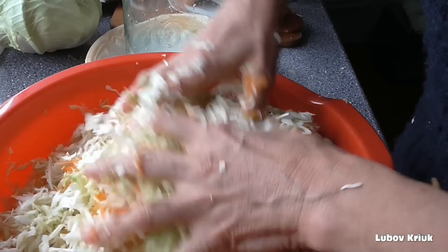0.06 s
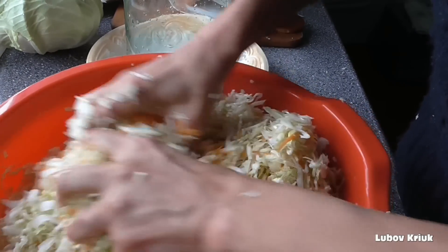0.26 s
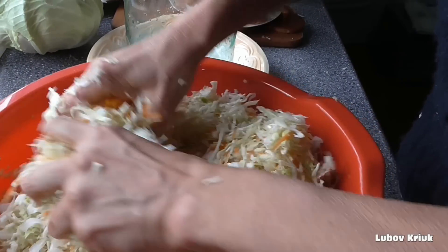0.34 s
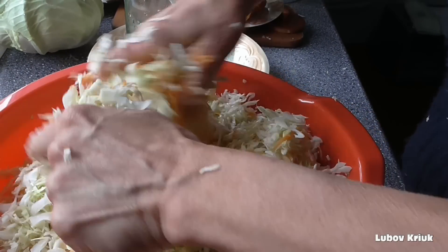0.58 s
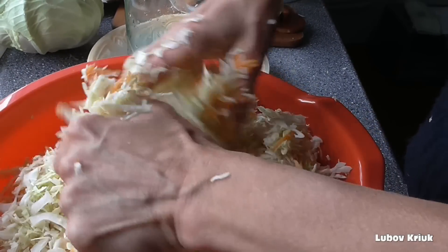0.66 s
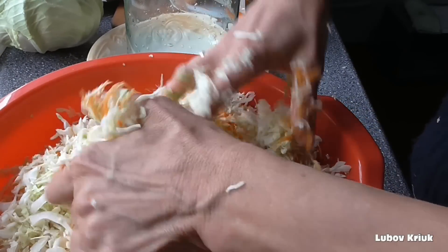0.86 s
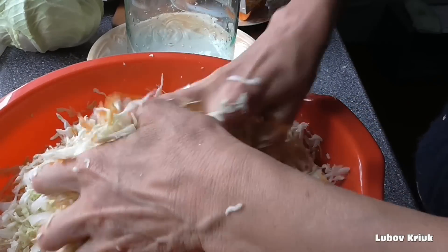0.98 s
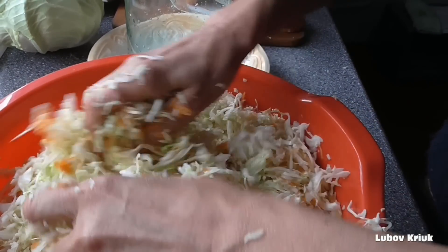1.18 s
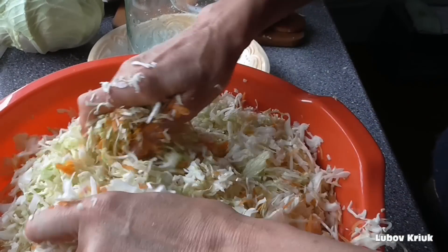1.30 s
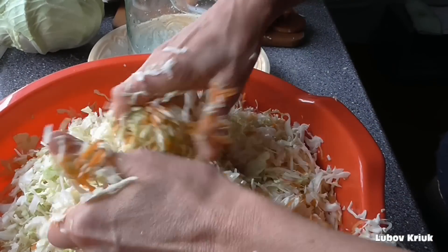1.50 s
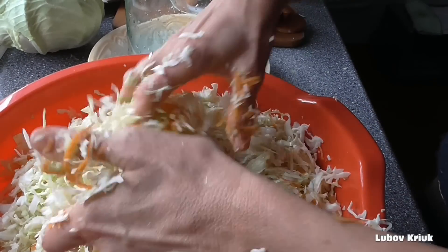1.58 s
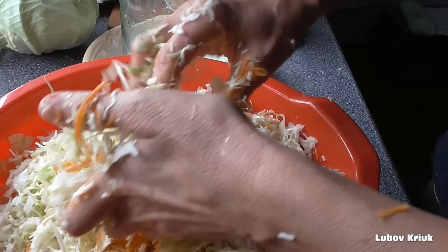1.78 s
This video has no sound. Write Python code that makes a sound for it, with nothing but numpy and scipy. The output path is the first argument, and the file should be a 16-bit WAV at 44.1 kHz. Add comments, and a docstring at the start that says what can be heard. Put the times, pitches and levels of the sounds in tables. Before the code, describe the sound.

Soft, wet crackle of shredded cabbage being squeezed by hand while its plastic bowl knocks.

```python
"""A soft, wet rustle and a few hollow knocks: two hands toss and squeeze shredded cabbage in a wide
plastic bowl on a kitchen counter, close to a stereo microphone. The shreds crackle as they slide and
part, juice ticks, and now and then a shred snaps. The heap rubs along the bowl, which knocks, judders
on its foot and thuds on the counter. Behind it an appliance hums in the small room."""
import sys
import numpy as np
from scipy import signal
from scipy.fft import rfft, irfft, next_fast_len
from scipy.io import wavfile

SR = 44100
rng = np.random.default_rng(int(sys.argv[2]) if len(sys.argv) > 2 else 0)


def transcribe(u):
    """Save the signal u as a 16-bit wav file named by the first command-line argument.

    u: samples, shape (n,) or (channels, n), limited to [-1, 1]; the rate is SR.
    q: integer samples, one column per channel.
    """
    v = np.clip(np.atleast_2d(u).T, -1, 1)
    q = np.round(v * 32767).astype(np.int16)
    wavfile.write(sys.argv[1], SR, q)


N = 81585
TIME = np.arange(N) / SR
SHRED_ROOM_DB, SNAP_ROOM_DB, BOWL_ROOM_DB = -9, -5, -6   # room tail against the direct sound

# How hard the hands stir the shreds. Each row: time in seconds, level in dB.
STIRRING = [(0, -48.5), (.056, -63.5), (.13, -64.5), (.22, -60.5), (.29, -51.5), (.335, -45.5), (.39, -44),
            (.45, -41.5), (.54, -46), (.62, -46), (.76, -45.5), (.85, -44), (.94, -43), (1.055, -54.5),
            (1.085, -50), (1.125, -57.5), (1.2, -47), (1.27, -54.5), (1.33, -43), (1.38, -42.5),
            (1.52, -43), (1.68, -53.5), (1.74, -61.5), (1.8, -68), (1.85, -71)]
# Stereo width of the close shreds. Each row: frequency in Hz, side against mid in dB.
SHRED_WIDTH = [(300, -13), (2500, -20), (5500, -17.5), (8500, -12.5), (11000, -2), (15000, -7)]
# Stereo width of the bowl. Each row: frequency in Hz, side against mid in dB.
BOWL_WIDTH = [(60, -17), (200, -26), (600, -19), (1500, -13.5), (3000, -8.5)]


def from_db(db):
    """Decibels to gain."""
    return 10 ** (np.asarray(db) / 20)


def rms_one(x):
    """Scale to unit power."""
    return x / np.sqrt(np.mean(x ** 2) + 1e-20)


def colour(x, points):
    """Causal (minimum-phase) filter through (Hz, dB) points on a log-frequency axis."""
    size = 2 * next_fast_len(N)
    bins_hz = np.arange(size // 2 + 1) * SR / size
    hz, db = np.transpose(points)
    gain = from_db(np.interp(np.log(bins_hz + 1), np.log(hz), db))
    cepstrum = irfft(np.log(gain))
    cepstrum[1:size // 2] *= 2
    cepstrum[size // 2 + 1:] = 0
    return irfft(rfft(x, size) * np.exp(rfft(cepstrum)))[..., :N]


def drift(hz):
    """A random waver with spread 1, mostly slower than hz."""
    step, settle = 40, 2000
    pole = np.exp(-2 * np.pi * hz * step / SR)
    draws = rng.standard_normal(N // step + settle + 2)
    slow = signal.lfilter([1], [1, -2 * pole, pole * pole], draws)[settle:]
    return np.interp(np.arange(N) / step, np.arange(len(slow)), rms_one(slow))


def ring(x, hz, t60):
    """One mode: a unit click sets a sine of height 1 ringing."""
    radius, angle = np.exp(-np.log(1000) / (t60 * SR)), 2 * np.pi * hz / SR
    return signal.lfilter([0, np.sin(angle)], [1, -2 * radius * np.cos(angle), radius ** 2], x + 1e-18)


def band(x, hz, q):
    """A broad resonance with gain 1 at its peak."""
    return signal.lfilter(*signal.iirpeak(min(hz, SR / 3), max(q, 1), fs=SR), x + 1e-18)


def stereo(mid, side, width):
    """The two microphone ports share the mid and take the filtered side with opposite signs."""
    return mid + colour(side, width) * np.array([[1], [-1]])


def noise(spectrum, width):
    """Smooth stereo noise of a given colour, at unit power."""
    mid, side = rng.standard_normal((2, N))
    return rms_one(colour(stereo(mid, side, width), spectrum))


def grains(per_s, spread_db):
    """Random clicks of uneven size and either sign."""
    sizes = from_db(spread_db * np.minimum(rng.exponential(1, N), 4.5))
    return sizes * rng.choice([-1, 1], N) * (rng.random(N) < per_s / SR)


def swell(peak_s, db, rise, hold, fall):
    """A gain that rises, holds and falls, straight in dB."""
    before, after = np.maximum(peak_s - TIME, 0), np.maximum(TIME - peak_s - hold, 0)
    return from_db(db - rise * before - fall * after)


def kitchen(x, wet_db):
    """The direct sound reaches the microphone first, then the small room's short diffuse tail."""
    t60_s, gap_s, width = 0.21, 0.0024, 0.31
    mid, side = rng.standard_normal((2, SR // 2))
    t = TIME[:SR // 2]
    tail = (mid + width * side * np.array([[1], [-1]])) * np.exp(-np.log(1000) * t / t60_s) * (t > gap_s)
    tail /= np.sqrt(np.sum(tail ** 2) / 2)
    return x + from_db(wet_db) * signal.fftconvolve(np.atleast_2d(x), tail, axes=1)[:, :N]


def room_tone():
    """Faint, diffuse noise from all round the kitchen."""
    # Colour of the room noise. Each row: frequency in Hz, relative density in dB.
    spectrum = [(25, -23), (50, -9), (130, -7), (220, 2.5), (350, -4), (550, 0.5), (1200, -14.5),
                (2700, -22), (8000, -20), (16000, -25)]
    # Its stereo width. Each row: frequency in Hz, side against mid in dB.
    width = [(30, -5), (100, -7), (250, -7), (450, -1), (3000, 4.5), (6000, -1), (15000, -13)]
    return from_db(-57.5) * noise(spectrum, width)


def appliance_hum():
    """Two wavering tones beat and reach the microphone ports slightly out of step."""
    # The hum's tones. Each row: frequency in Hz, mean level in dB.
    tones = [(194.5, -64.5), (231.3, -63)]
    waver_db, lag_turns = 3.26, -0.074 * np.array([[.5], [-.5]])
    hum = 0
    for hz, db in tones:
        height = np.sqrt(2) * from_db(db + waver_db * drift(hz=6.3))
        hum = hum + height * np.sin(2 * np.pi * (hz * TIME + rng.random() + lag_turns))
    return hum


def thuds():
    """The weight of the hands reaches the counter as a dull rumble."""
    # The heap is pressed down. Each row: peak time in seconds, level in dB, rise in dB per second,
    # hold in seconds, fall in dB per second.
    presses = [(0.127, -67.5, 700, .025, 250), (0.277, -60, 403, 0.074, 51), (0.83, -62.5, 700, 0.025, 105),
               (0.982, -48.5, 125, 0.028, 450), (1.087, -48.5, 700, 0.051, 139)]
    # Colour of the rumble. Each row: frequency in Hz, relative density in dB.
    spectrum = [(35, -44), (65, -21), (98, -2), (135, -9), (200, -11), (310, -14), (600, -39.5)]
    return sum(swell(*press) for press in presses) * noise(spectrum, BOWL_WIDTH)


def judder():
    """Under the hardest push the bowl's foot sticks and slips in a quick, nearly even train."""
    # Course of the judder. Each row: time in seconds, level in dB.
    levels = [(.8, -81), (.83, -52.5), (.875, -55), (.915, -38.5), (.965, -40), (1.005, -44), (1.04, -58),
              (1.09, -57), (1.2, -80)]
    # Modes of the shaken counter. Each row: frequency in Hz, relative level in dB, t60 in seconds.
    counter_modes = [(167, -8.5, 0.14), (246, 0.5, 0.15), (486, -3, 0.096), (576, -2, 0.11),
                     (642, 2.5, 0.06), (808, 0.5, 0.064), (1630, -22, 0.045)]
    slip_hz, jitter, uneven_db = 82.1, 0.0196, 0.9
    turns = np.cumsum(slip_hz * (1 + jitter * drift(hz=27.4))) / SR
    slips = np.diff(np.floor(turns), prepend=0) * from_db(uneven_db * drift(hz=64))
    shaken = rms_one(sum(from_db(db) * ring(slips, hz, t60) for hz, db, t60 in counter_modes))
    return from_db(np.interp(TIME, *np.transpose(levels))) * shaken


def knocks():
    """The bowl strikes the counter a little left of centre: a hollow clack, then its body rings."""
    # Each row is a knock: start in seconds, clack level in dB, pitch in Hz, ring against clack in dB.
    hits = [(0.1037, -39, 940, -1), (.1075, -43.5, 1890, 14.5), (0.1422, -44.5, 1520, 12),
            (0.1549, -32, 900, -1), (0.2145, -30, 1846, 6.5), (.803, -35.5, 1710, 4.5),
            (1.3591, -25.5, 1710, -19), (1.3757, -15.5, 1840, -7)]
    # A contact's brief tones. Each row: multiple of its pitch, relative level in dB, t60 in seconds.
    contact_tones = [(.72, -13.5, 0.025), (1, 6, 0.0091), (1.75, -12, 0.013)]
    # The bowl's modes. Each row: frequency in Hz, relative level in dB, t60 in seconds.
    bowl_modes = [(192.5, -20, 0.2), (393, -23.5, 0.077), (591, -16.5, 0.038), (737, -16, 0.064),
                  (1216, -21.5, .06), (1440, -16, 0.032), (1804, -26, .07), (1950, -23.5, 0.045),
                  (2034, -23.5, 0.03), (3330, -45, 0.013)]
    rise_s, lowest_hz, pan_db = 0.00024, 147, 2.1
    clacks, blows = np.zeros(N), np.zeros(N)
    t = TIME[:SR // 20]
    for start_s, db, hz, body_db in hits:
        clack = sum(from_db(level) * np.sin(2 * np.pi * hz * ratio * t) * np.exp(-np.log(1000) * t / t60)
                    for ratio, level, t60 in contact_tones)
        clack *= 1 - np.exp(-t / rise_s)
        start = int(start_s * SR)
        clacks[start:start + len(t)] += from_db(db) * clack / np.abs(clack).max()
        blows[start] = from_db(db + body_db)
    body = sum((-1) ** k * from_db(db) * ring(blows, hz, t60)
               for k, (hz, db, t60) in enumerate(bowl_modes))
    low_cut = signal.butter(2, lowest_hz, "high", fs=SR, output="sos")
    return signal.sosfilt(low_cut, clacks + body) * from_db(pan_db * np.array([[.5], [-.5]]))


def rubbing():
    """Dense small slips between heap, bowl and counter: light pushes sound dull, hard ones brighter."""
    # The heap is pushed along the bowl. Each row: peak time in seconds, level in dB, rise in dB per
    # second, hold in seconds, fall in dB per second, bass tilt in dB per octave, added width in dB.
    pushes = [(0, -53, 100, 0.011, 77, 4.5, 3), (0.247, -52.5, 900, .01, 90, 6, 7),
              (0.361, -42, 130, 0.081, 159, 1, -6.5), (0.901, -34.5, 166, 0.025, 128, 0.5, 4.5),
              (1.085, -54.5, 500, 0.016, 69, 4.5, 3), (1.374, -43, 400, 0.02, 108, -1.5, 3.5)]
    # Colour of the rubbing before the tilt. Each row: frequency in Hz, relative density in dB.
    spectrum = [(50, -33), (120, -20.5), (170, -12), (300, -12), (410, -2.5), (620, 1.5), (850, -4),
                (1150, -0.5), (1800, -3), (2300, -13), (2900, -14), (5000, -32)]
    out = 0
    for peak_s, db, rise, hold, fall, tilt_db, width_db in pushes:
        mid, side = (grains(per_s=2200, spread_db=1.9) for _ in range(2))
        slips = stereo(mid, from_db(width_db) * side, BOWL_WIDTH)
        tilted = [(hz, level - tilt_db * np.log2(hz / spectrum[0][0])) for hz, level in spectrum]
        out = out + swell(peak_s, db, rise, hold, fall) * rms_one(colour(slips, tilted))
    return out


def juice():
    """Thin films of juice part between shreds and fingers with bright ticks, even in slow stirring."""
    # Colour of the ticks. Each row: frequency in Hz, relative density in dB.
    spectrum = [(2000, -28), (6000, -8), (9000, -3.5), (12500, 0), (16000, -7.5)]
    loudest_db, follows_stirring, tick_s = -56, 0.56, 0.00046
    stir_db = np.interp(TIME, *np.transpose(STIRRING))
    partings = np.abs(grains(per_s=300, spread_db=3))
    bursts = signal.lfilter([1], [1, -np.exp(-1 / (tick_s * SR))], partings + 1e-18)
    ticks = rms_one(bursts * noise(spectrum, SHRED_WIDTH))
    gain = from_db(loudest_db + follows_stirring * (stir_db - stir_db.max()))
    return kitchen(gain * ticks, SHRED_ROOM_DB)


def snaps():
    """A single shred breaks near the microphone in a burst of a few milliseconds."""
    # Each row is a snap: start in seconds, relative peak in dB, pitch in Hz, length in seconds.
    breaks = [(.119, -49, 13000, .001), (.146, -43, 13200, .001), (0.184, -45.5, 5130, 0.0024),
              (0.3243, -28, 7100, 0.003), (0.4535, -24.5, 5050, 0.003), (0.489, -28.5, 5300, 0.0017),
              (0.5004, -32, 2530, 0.0038), (.5064, -23, 5400, 0.0012), (0.5314, -29.5, 2370, 0.0024),
              (.566, -20.5, 5030, 0.0023), (.5662, -24, 12100, 0.0025), (0.5877, -25, 4900, 0.0013),
              (.6935, -26.5, 4200, 0.0022), (0.742, -29, 6150, 0.0017), (0.7571, -25, 6230, 0.0028),
              (0.7597, -34, 2170, 0.0053), (0.8203, -29, 5200, 0.0045), (0.837, -27, 5240, 0.00092),
              (1.082, -35.5, 5100, 0.0026), (1.1932, -38.5, 2040, 0.0029), (1.1938, -29, 5070, 0.0018),
              (1.2387, -25.5, 8300, .0015), (1.353, -27.5, 4150, .005), (1.368, -32, 10100, 0.0016),
              (1.396, -26, 8800, .002), (1.4294, -24, 6400, 0.00084), (1.493, -25.5, 4240, .003),
              (1.506, -26, 5900, 0.0011), (1.515, -29, 4460, 0.0017), (1.725, -47.5, 10800, .012)]
    trim_db, edge, rise_s = -2, 0.096, 0.00024
    out = np.zeros(N)
    t = TIME[:SR // 20]
    for start_s, db, hz, length_s in breaks:
        envelope = np.exp(-(t / length_s) ** 2) * (1 - np.exp(-t / rise_s))
        tear = band(rng.standard_normal(len(t)) * envelope, hz, q=1)
        burst = band(tear, hz, q=1.9) + edge * tear
        start = int(start_s * SR)
        out[start:start + len(t)] += from_db(db + trim_db) * burst / np.abs(burst).max()
    return kitchen(out, SNAP_ROOM_DB)


def shreds():
    """Close up, wet shreds slide and part in clumps of clicks, more and louder under harder stirring."""
    # Colour of the crackle and its hiss. Each row: frequency in Hz, filter gain in dB.
    spectrum = [(60, -36), (250, -6), (500, -8), (850, -4), (1250, 0.5), (2200, -2), (3000, -9.5),
                (4000, -1.5), (5100, 1.5), (6800, -1.5), (9500, -8), (13000, -16), (16000, -26)]
    most_clicks_per_s, crackle_db, hiss_db, clump_db = 4500, -3, -5, 3
    stir_db = np.interp(TIME, *np.transpose(STIRRING))
    busy = from_db(0.5 * (stir_db - stir_db.max()))
    pitches_hz = np.geomspace(500, 14000, 16)
    shares = np.sqrt(pitches_hz) / np.sqrt(pitches_hz).sum()
    mid = side = 0
    for hz, share in zip(pitches_hz, shares):
        clicks = grains(most_clicks_per_s * share * busy, spread_db=3)
        clicks /= np.sqrt(share * busy)   # the same power at any click rate
        mid = mid + band(clicks, hz, q=1.9)
        side = side + band(clicks * rng.standard_normal(N), hz, q=1)
    crackle = rms_one(colour(stereo(mid, side, SHRED_WIDTH), spectrum))
    crackle *= from_db(crackle_db + clump_db * drift(hz=27))
    hiss = from_db(hiss_db) * noise(spectrum, SHRED_WIDTH)
    return kitchen(from_db(stir_db) * (crackle + hiss), SHRED_ROOM_DB)


def scene():
    """Cabbage in front, bowl and counter under it, the kitchen behind."""
    cabbage = shreds() + juice() + snaps()
    bowl = kitchen(rubbing() + knocks() + judder(), BOWL_ROOM_DB)
    return cabbage + bowl + thuds() + appliance_hum() + room_tone()


def record(dry):
    """The microphone's two ports differ slightly in colour; the top is cut steeply."""
    # Balance of the ports. Each row: frequency in Hz, left minus right in dB.
    balance = [(120, 1.7), (350, -2.3), (700, -0.9), (1400, 0), (2500, 0.2), (5500, 0.5), (9500, -2.5),
               (14000, 3.5)]
    cutoff_hz = 15700
    left = colour(dry[0], [(hz, db / 2) for hz, db in balance])
    right = colour(dry[1], [(hz, -db / 2) for hz, db in balance])
    high_cut = signal.ellip(10, .1, 80, cutoff_hz, fs=SR, output="sos")
    return signal.sosfilt(high_cut, np.array([left, right]))


dry = scene()
out = record(dry)
transcribe(out)
```